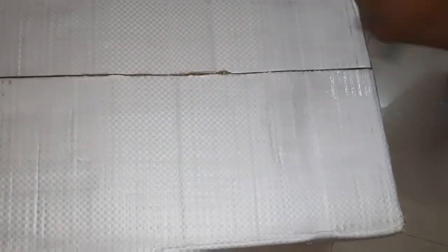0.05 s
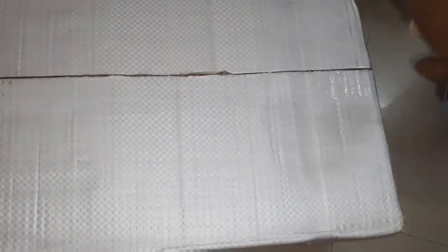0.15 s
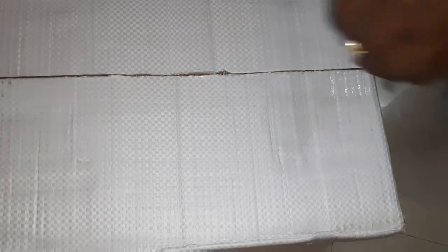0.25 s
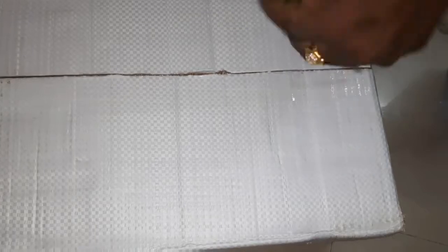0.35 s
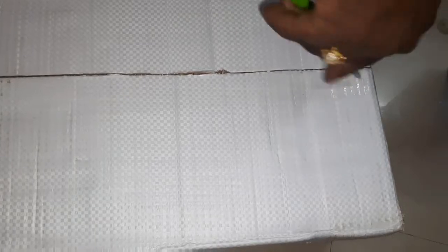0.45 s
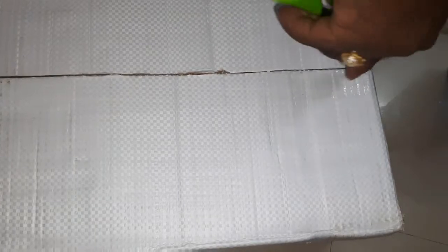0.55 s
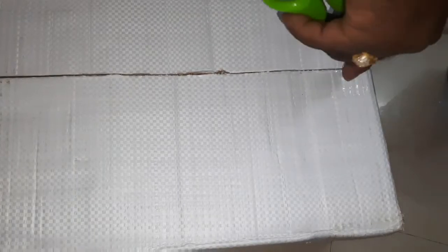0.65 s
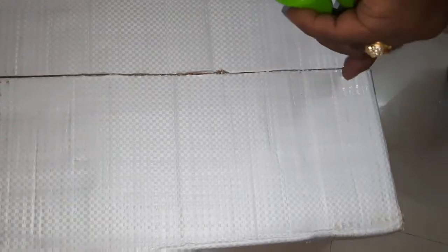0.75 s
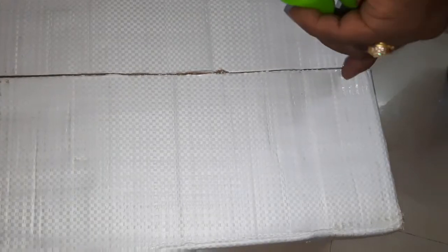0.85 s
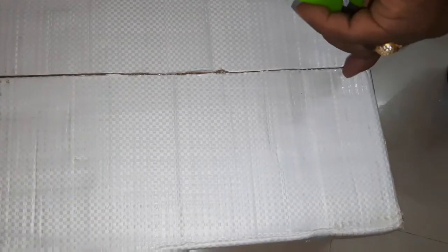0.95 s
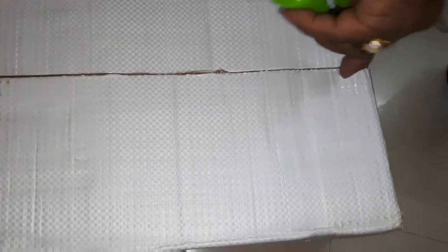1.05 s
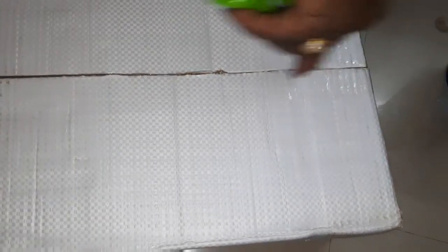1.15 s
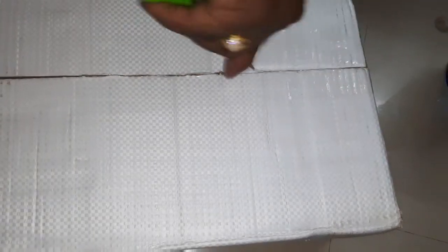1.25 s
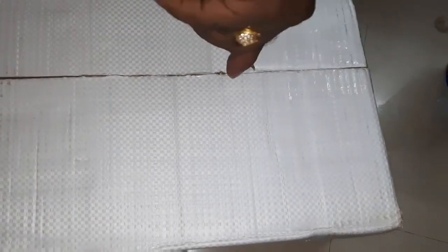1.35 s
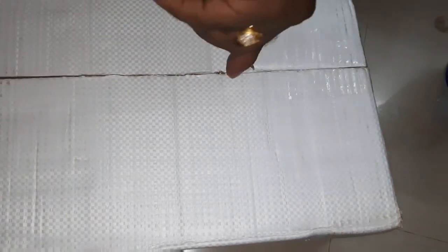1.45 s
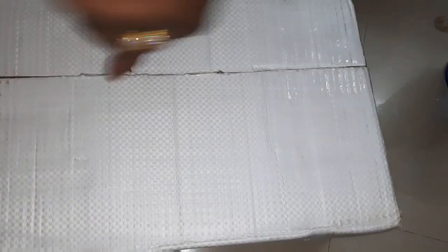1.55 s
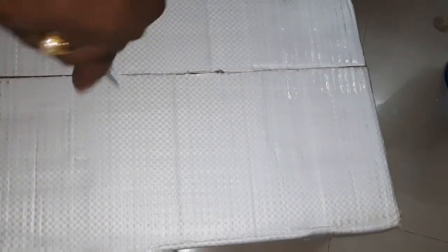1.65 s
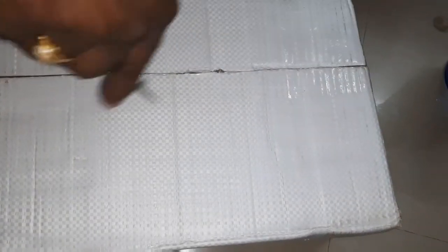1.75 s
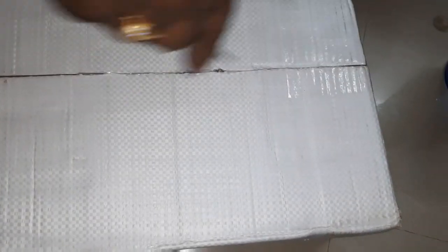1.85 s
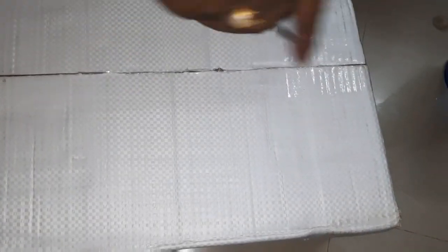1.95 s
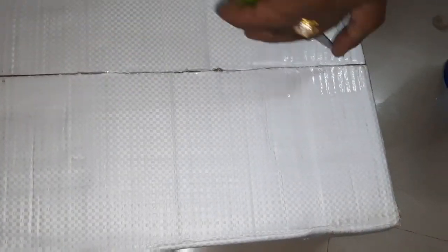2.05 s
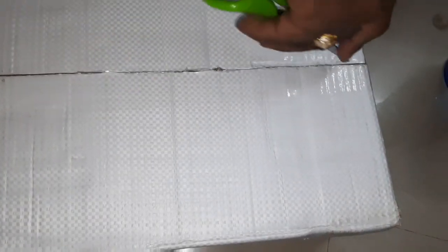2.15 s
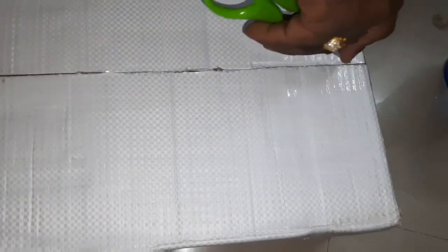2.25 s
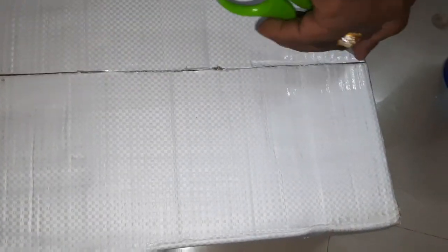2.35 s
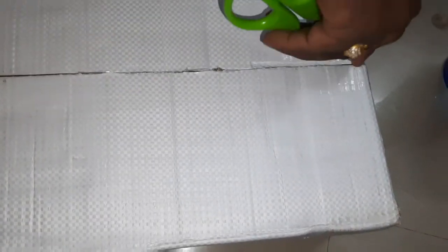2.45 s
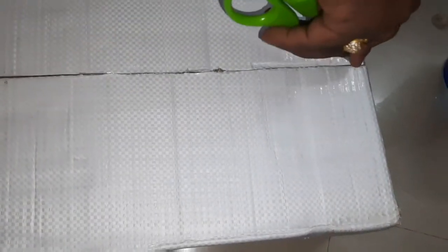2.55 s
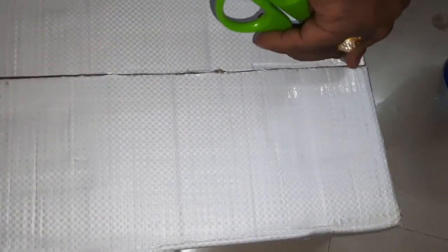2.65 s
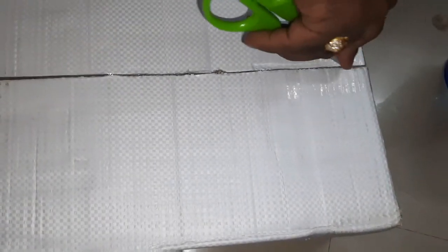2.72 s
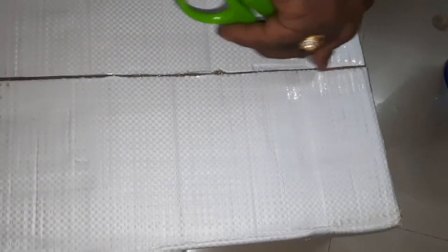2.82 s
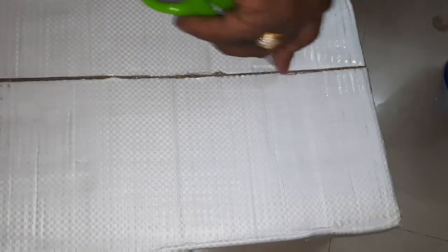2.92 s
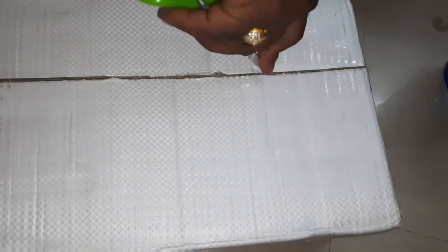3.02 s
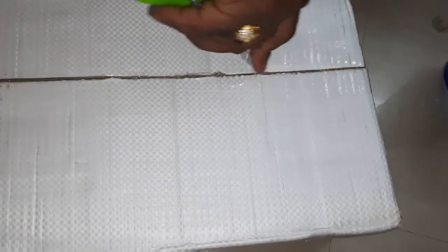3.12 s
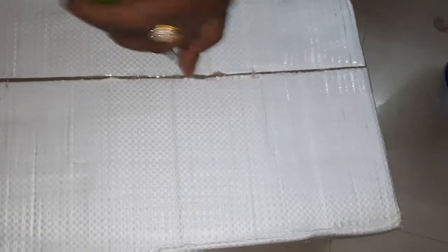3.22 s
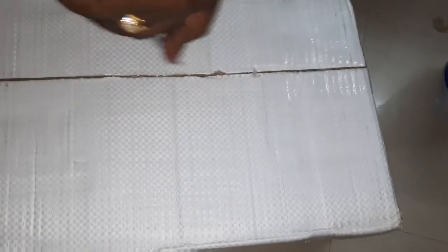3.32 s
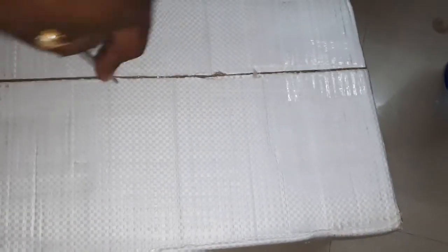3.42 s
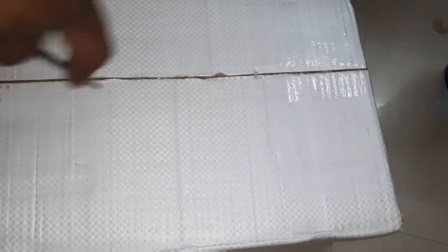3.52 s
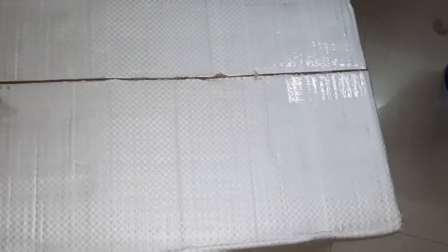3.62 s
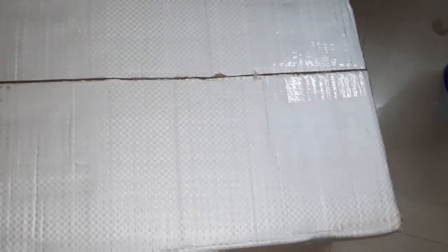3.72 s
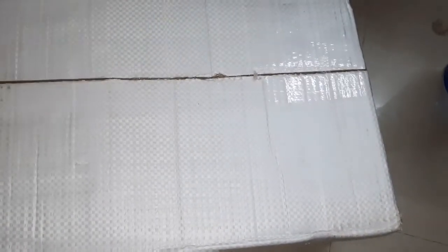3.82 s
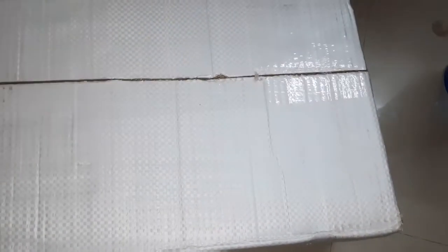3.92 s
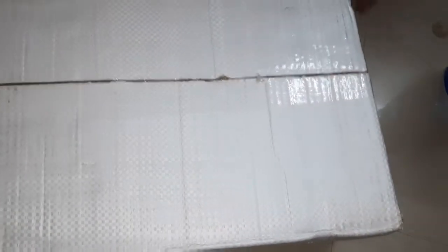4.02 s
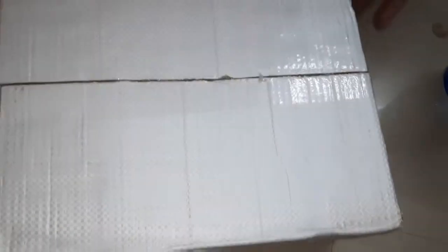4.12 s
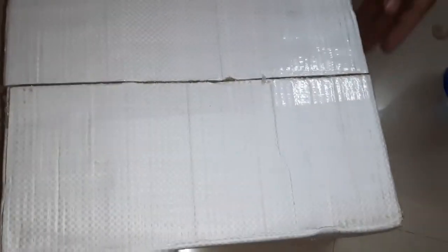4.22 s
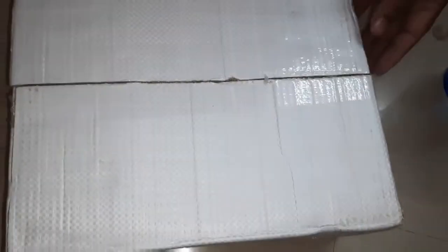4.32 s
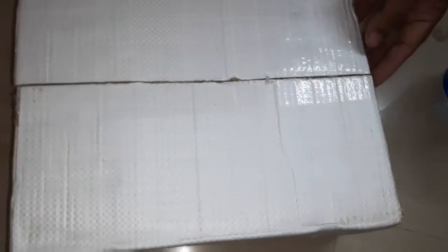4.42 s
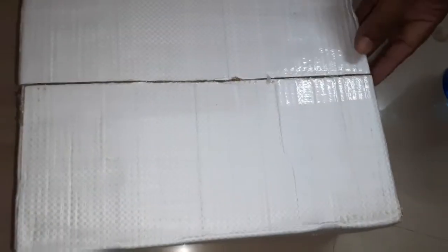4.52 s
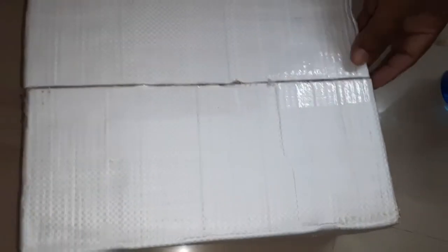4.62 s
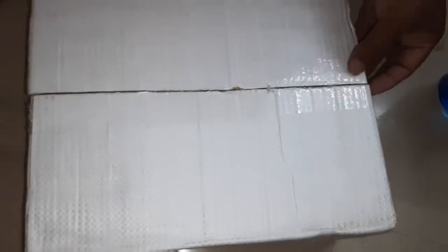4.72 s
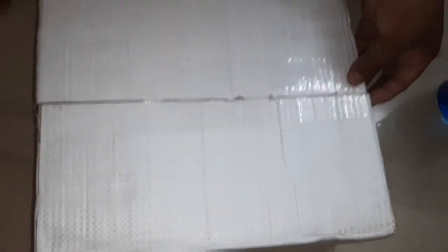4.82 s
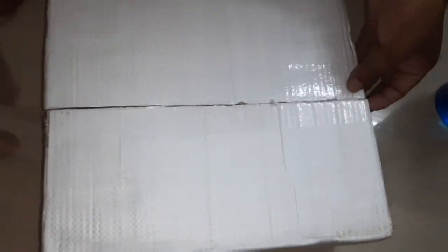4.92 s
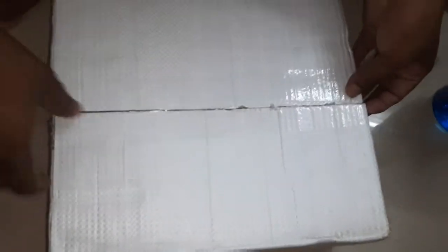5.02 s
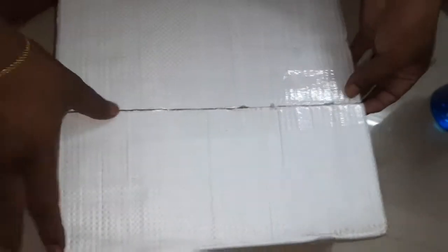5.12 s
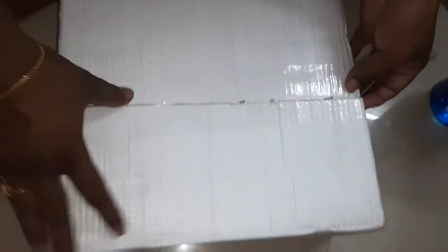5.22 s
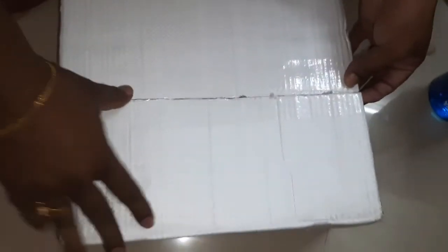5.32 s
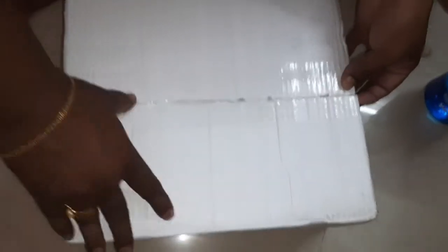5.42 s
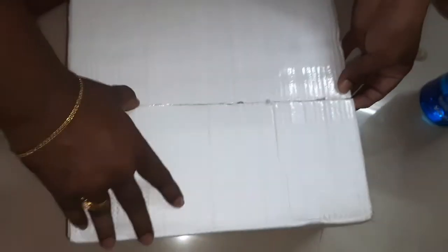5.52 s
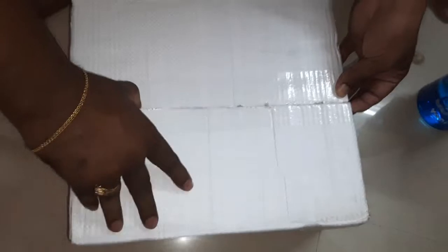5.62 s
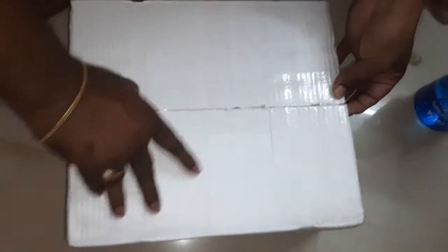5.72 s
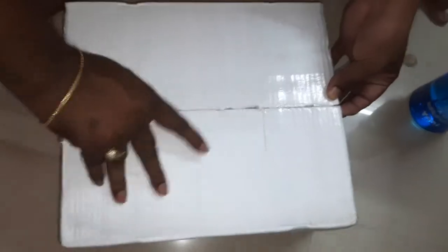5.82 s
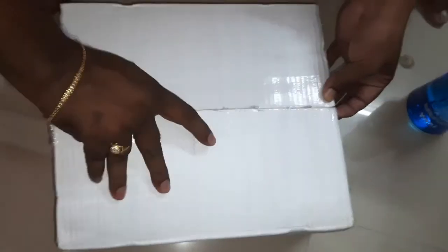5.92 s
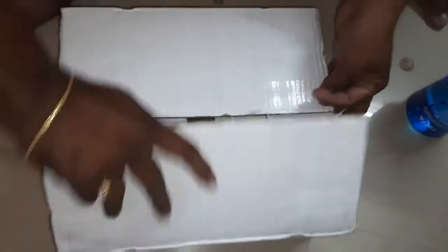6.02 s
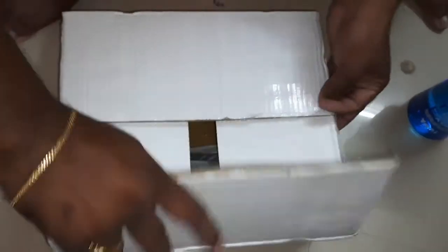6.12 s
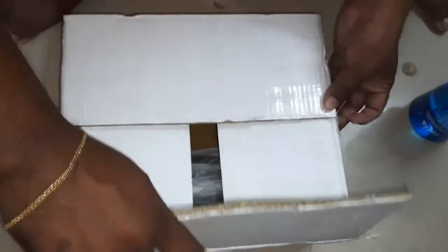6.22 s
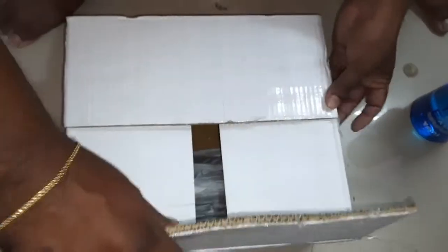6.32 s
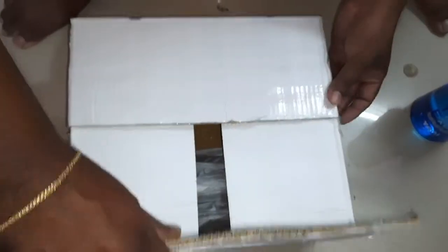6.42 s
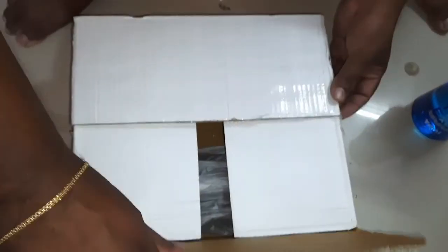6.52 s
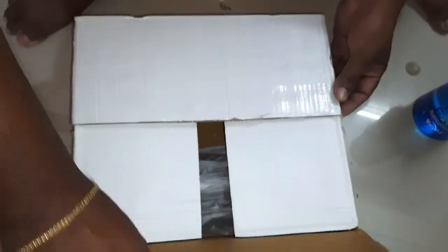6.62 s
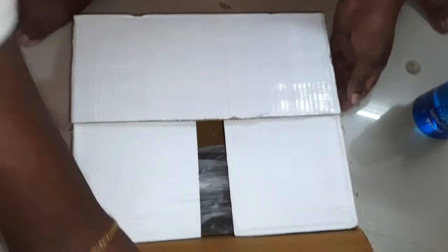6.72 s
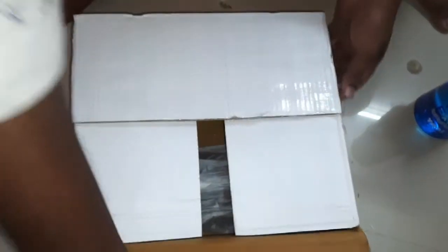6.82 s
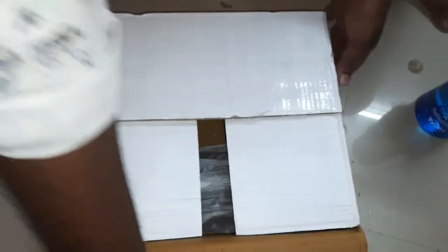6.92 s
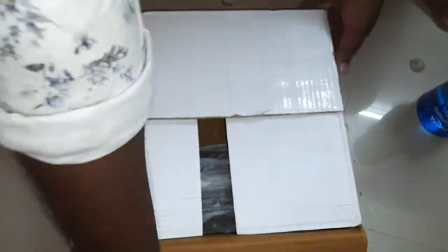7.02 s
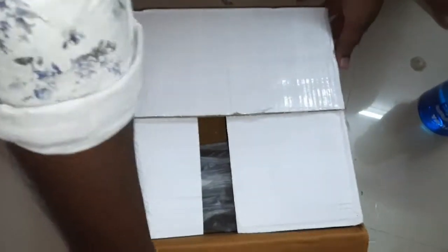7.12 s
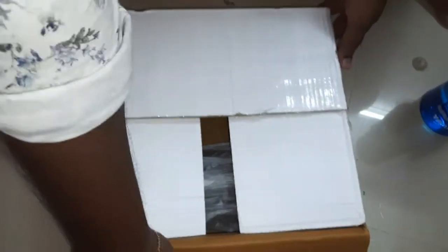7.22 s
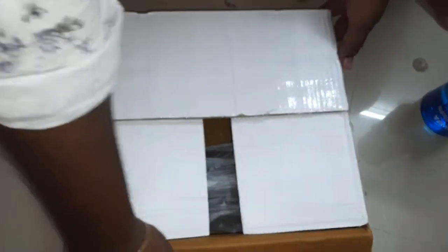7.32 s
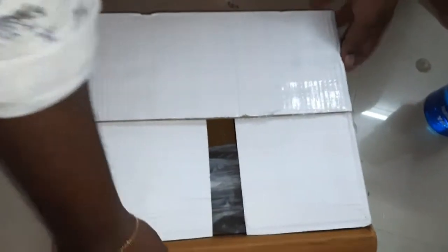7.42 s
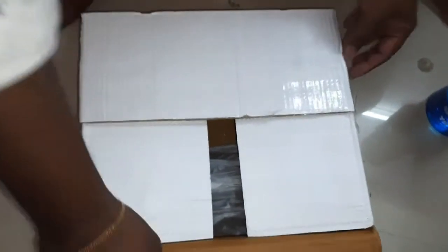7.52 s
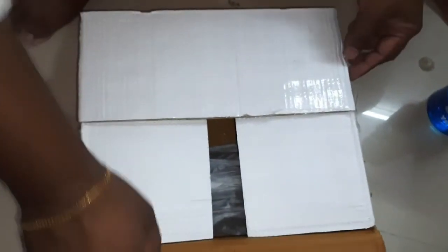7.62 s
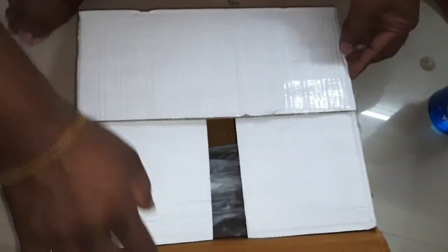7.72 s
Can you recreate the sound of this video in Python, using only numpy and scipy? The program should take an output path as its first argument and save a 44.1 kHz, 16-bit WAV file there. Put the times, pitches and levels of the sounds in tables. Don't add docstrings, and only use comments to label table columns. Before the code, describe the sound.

Short hollow blade drags over a cardboard box, a metallic clink, then peeling tape pops, two booming thumps and crackling card folding back.

```python
import sys
import numpy as np
from scipy import signal
from scipy.fft import rfft, irfft
from scipy.io import wavfile
from scipy.ndimage import uniform_filter1d

SR = 44100
rng = np.random.default_rng(int(sys.argv[2]) if len(sys.argv) > 2 else 0)


def dump_mix(stems):
    frames = np.atleast_2d(stems).T
    limited = np.clip(frames, -1, 1)
    pcm = np.round(limited * 32767).astype(np.int16)
    wavfile.write(sys.argv[1], SR, pcm)


def natural_amplitude(level_db):
    exponent = np.asarray(level_db, float) / 20
    return 10 ** exponent


N = 342216


def unit_rms(x):
    return x / np.sqrt(np.mean(x ** 2) + 1e-20)


def read(points, hz):
    f, value = np.transpose(points)
    return np.interp(np.log(hz + 1), np.log(f + 1), value)


def add(mix, s, sound):
    part = mix[round(s * SR):][:len(sound)]
    part += sound[:len(part)]


def filtered(x, points):
    return irfft(rfft(x) * natural_amplitude(read(points, np.fft.rfftfreq(len(x), 1 / SR))), len(x))


def coloured(x, points):
    return unit_rms(filtered(x, points))


def ring(modes, seconds, shift=1):
    t = np.arange(round(seconds * SR)) / SR
    return sum(natural_amplitude(db - 60 * t / t60) * np.sin(2 * np.pi * hz * shift * t) for hz, db, t60 in modes)


def levels(tables):
    out = np.zeros((len(tables[0][0]) - 1, N))
    for rows in tables:
        s, *columns = np.transpose(rows)
        t = np.arange(s[0], s[-1], 1 / SR)
        since_start = t - s[0] + (s[0] == 0)
        edge = np.clip(np.minimum(since_start, s[-1] - t) / 0.0016, 0, 1)
        for line, db in zip(out, columns):
            add(line, s[0], edge * natural_amplitude(np.interp(t, s, db)))
    return out


# (f/Hz, level/dB per Hz)
RUMBLE = [(28, -44), (40, -5), (176, -6), (239, -8), (399, -13.5), (454, -15.5), (778, -23), (930, -28),
          (1300, -29.5), (1680, -31.5), (1810, -29), (2400, -32), (3350, -35.5), (4440, -54.5),
          (8500, -58.5), (13500, -54.5), (16000, -57.5)]
# (t/s, level/dB)
WHINE = [(0, -77), (1.8, -85), (3.6, -81), (3.95, -74), (4.15, -71.5), (4.4, -82), (7.76, -76)]


def house():
    swell = uniform_filter1d(rng.standard_normal(N), size=5000)
    swell_db = 1.2 * unit_rms(uniform_filter1d(swell, size=5000))
    rumble = natural_amplitude(-55.5 + swell_db) * coloured(rng.standard_normal(N), RUMBLE)
    hum_hz, hum_width_hz, hum_db = 49.5, 10, -64.5
    hum = signal.oaconvolve(rng.standard_normal(N), ring([(hum_hz, 0, 2.6 / hum_width_hz)], .3))[:N]
    hum = natural_amplitude(hum_db) * unit_rms(np.diff(hum, prepend=0))
    whine_hz, whine_width_hz = 2330, 55
    whine = signal.oaconvolve(rng.standard_normal(N), ring([(whine_hz, 0, 2.4 / whine_width_hz)], .1))[:N]
    return levels([WHINE])[0] * unit_rms(whine) + rumble + hum


# (f/Hz, t60/s)
ROOM = [(125, 0.31), (500, 0.28), (2000, 0.27), (6000, 0.27), (14000, 0.19)]


def room(x):
    hz, t, z = signal.stft(rng.standard_normal((3, SR // 2)), SR, nperseg=256)
    tails = signal.istft(z * natural_amplitude(-60 * t / read(ROOM, hz)[:, None]), SR, nperseg=256)[1]
    tails = tails * np.clip(np.arange(tails.shape[1]) / (0.0013 * SR), 0, 1)
    turn = 2 * np.pi * (np.arange(N) / (.13 * SR) + np.arange(3)[:, None] / 3)
    shares = np.sqrt(2 / 3) * np.cos(turn) * x
    return signal.fftconvolve(shares, tails / np.linalg.norm(tails[0]), axes=1)[:, :N].sum(0)


# (t/s, peak level/dB, centre f/Hz)
TICKS = [(1.0927, -55, 8600), (1.653, -33, 6400), (1.83, -59, 9630), (1.9294, -66.5, 5900),
         (2.577, -54, 13200), (2.8494, -43, 5400), (2.8873, -42, 5360), (3.009, -31, 9150),
         (3.119, -45.5, 5880), (4.7036, -47, 12500), (4.795, -43, 11600), (5.2135, -56, 12000),
         (5.2629, -53.5, 5370), (5.2713, -46, 11100), (5.3294, -67, 5510), (5.472, -52, 12200),
         (5.625, -50, 11000), (5.642, -56, 8000), (5.672, -53, 10500), (5.683, -47, 4600),
         (5.8306, -51, 5600), (6.124, -44, 9720), (6.86, -39, 12600), (7.2315, -49, 12400),
         (7.275, -53, 11700)]


def ticks():
    out, t = np.zeros(N), np.arange(300) / SR
    for (s, db, hz), noise in zip(TICKS, rng.standard_normal((len(TICKS), len(t)))):
        burst = np.convolve(noise, ring([(hz, 0, .0006)], .001))[:len(t)]
        add(out, s, natural_amplitude(db - 60 * t / 0.0031) * unit_rms(burst))
    return out


# (t/s, peak level/dB, long blade level/dB, short blade level/dB, tick level/dB)
CLINKS = [
    (0.284, -46.5, -72, -70, -7.5),
    (.362, -33.5, -54, -68, 5),
    (0.3692, -39.5, -58, -63, 7),
    (0.383, -45.5, -68, -66.5, -2),
    (4.171, -41.5, -68, -54.5, -7),
    (4.195, -49.5, -70, -52.5, 3),
    (4.376, -33.5, -59, -53, 9),
    (4.396, -33, -51, -59, 18),
    (4.4085, -27.5, -54, -60, 4.5),
    (4.452, -34.5, -54, -55, -8),
]
# (f/Hz, level/dB)
HELD_STEEL = [(6500, -2), (3870, -5), (7820, 2), (8500, 0.5), (8800, 5), (9340, 1), (9860, -1), (10500, 1),
              (11300, 0), (12100, 1), (12900, 0), (13400, -1), (14900, -1.5), (15700, 2.5)]
TIPPED_STEEL = [(2815, -6), (4170, 0), (4880, -0.5), (5140, -2), (5800, -6), (7970, -5), (8520, 5),
                (9900, 2), (10600, -5), (11400, 3), (12600, -4), (13200, 4), (13900, 5), (15400, 0)]
LAID_STEEL = [(5300, -7), (6730, -8), (7520, 2), (7900, -3), (8870, 5), (11100, -2), (10450, 1),
              (11600, -3), (11990, -2), (12820, 11), (13400, 2), (14200, 0), (14760, -5.5), (15500, -5)]
BLADES_HZ = (2740, 3344)
# (f/Hz, level/dB per Hz)
SPRAY = [(2000, -23), (3000, 8.5), (4500, -5), (6200, -12), (8000, -7.5), (15500, 8)]
SPRAY_DB = (-9.5, -5, -10.5)


def clinks():
    out, t = np.zeros(N), np.arange(round(.3 * SR)) / SR
    high = signal.butter(5, 7500, "high", fs=SR)
    haze = signal.butter(3, 2400, "high", fs=SR)
    steel_cycles, blade_cycles = 95, 140
    mix_spread_db = 4
    tipped_from_s, laid_from_s = 4, 4.3
    mixes = rng.standard_normal((len(CLINKS), len(LAID_STEEL)))
    for (s, db, long_db, short_db, tick_db), mix in zip(CLINKS, mixes):
        stage = np.searchsorted([tipped_from_s, laid_from_s], s)
        modes = (HELD_STEEL, TIPPED_STEEL, LAID_STEEL)[stage]
        cycles = steel_cycles * (0.72, 0.72, 1)[stage]
        steel = ring([(hz, db - 35.5 + d + mix_spread_db * m, cycles / hz)
                      for (hz, d), m in zip(modes, mix)], .1)
        blades = ring([(hz, d - 16, blade_cycles / hz)
                       for hz, d in zip(BLADES_HZ, (long_db, short_db))], .1)
        chatter_t60_s = (0.041, 0.23, 0.26)[stage]
        chatter = rng.standard_normal(len(t))
        chatter = chatter * (natural_amplitude(-60 * t / 0.0084) + natural_amplitude(-3.0 - 60 * t / chatter_t60_s))
        blurred = signal.fftconvolve(steel + blades, chatter)[:len(t)]
        hiss = natural_amplitude(db + SPRAY_DB[stage]) * np.std(chatter) * coloured(chatter, SPRAY)
        rung = signal.lfilter(*haze, blurred + hiss)
        tick = signal.lfilter(*high, rng.standard_normal(len(t)))
        tick = tick * (natural_amplitude(-60 * t / 0.011) + natural_amplitude(8.0 - 60 * t / 0.0014)) * (1 - np.exp(-t / 0.00008))
        add(out, s, rung + natural_amplitude(db + tick_db - 3) * tick)
    return out


# (t/s, level/dB)
CREASE = [(6.455, -65), (6.48, -57), (6.53, -50), (6.62, -55.5), (6.668, -69), (6.69, -76)]
# (f/Hz, width f/Hz, level/dB)
CREASE_BANDS = [(1100, 280, -4), (1690, 240, 0), (2010, 240, -4)]


def crease():
    shape = ring([(hz, db, 2.2 / width) for hz, width, db in CREASE_BANDS], .03)
    bands = signal.oaconvolve(rng.standard_normal(N), np.convolve(shape, shape))
    return levels([CREASE])[0] * unit_rms(bands[:N])


# (t/s, peak level/dB, ring f/Hz, treble level/dB)
SNAGS = [(0.0094, -14, 1674, -20), (0.919, -56, 2910, -56.5), (1.144, -26, 1780, -36),
         (1.183, -26.5, 3240, -43), (1.2038, -24, 3950, -42.5), (1.211, -22, 3230, -45),
         (1.219, -24, 2030, -50), (1.247, -34, 2280, -36), (1.292, -29, 2740, -47),
         (1.305, -32.5, 1500, -50), (1.2686, -27, 2380, -30), (1.531, -42, 2600, -57),
         (1.5605, -22, 1110, -41.5), (1.602, -23, 3020, -56.5), (2.6786, -41, 3790, -42),
         (2.725, -32, 1740, -48.5), (2.821, -32.5, 2708, -50), (2.845, -30.5, 2400, -52),
         (2.906, -22.5, 1960, -49.5), (2.923, -24, 2380, -38), (2.935, -21, 1910, -46),
         (3.001, -27.5, 2500, -47), (2.9495, -23, 2100, -31.5), (2.9699, -22.5, 2400, -41),
         (3.029, -25.5, 2300, -35), (3.1282, -36, 2200, -49), (3.172, -38.5, 2040, -47),
         (3.2102, -14, 5430, -26.5), (3.2225, -13, 3400, -37), (3.27, -24, 2330, -47.5), ]
PEELS = [(4.624, -30, 2800, -79), (4.77, -64, 2200, -54), (4.8288, -42, 1360, -46.5),
         (4.8642, -41, 1430, -54), (4.98, -45, 2500, -53.5), (5.504, -66, 2200, -56),
         (5.524, -34.5, 3520, -45.5), (5.5463, -41, 3280, -57), (5.568, -43, 3560, -52),
         (5.5956, -37.5, 3440, -67.5), (5.632, -35.5, 3060, -73), (5.664, -42, 3360, -58),
         (5.7036, -16, 2740, -27.5), (5.8, -32, 2600, -65), (5.859, -26, 2630, -67),
         (5.8944, -36, 3870, -47), (5.948, -23.5, 2340, -67), (5.9665, -7.5, 2310, -21),
         (6.0219, -17, 5350, -20), (6.0238, -16.5, 3200, -30.5), (5.701, -30.5, 2170, -37),
         (5.6375, -41, 3000, -70), ]
FOLDS = [(6.1537, -28.5, 3120, -33), (6.226, -38, 5940, -45), (6.2409, -30, 1950, -43),
         (6.265, -25, 3330, -50), (6.289, -31, 2550, -37), (6.317, -26, 2490, -33.5),
         (6.3712, -27, 2500, -72), (6.537, -25, 2450, -36), (6.7588, -32, 2340, -38.5),
         (6.7704, -32, 2150, -39), (6.7925, -30, 2620, -60), (6.8184, -31.5, 2570, -46),
         (6.841, -37, 3100, -46), (6.9129, -32, 3250, -45), (6.96, -36, 3700, -45),
         (6.997, -34.5, 3230, -45), (7.0876, -40.5, 3270, -52), (7.128, -30, 1630, -58),
         (7.2146, -46, 2780, -52), (7.493, -46.5, 3570, -73), (7.5904, -56, 1650, -54)]


def snaps():
    near, far, t = np.zeros(N), np.zeros(N), np.arange(900) / SR
    high = signal.butter(2, [5200, 16500], "band", fs=SR)
    band = signal.butter(2, [1700, 4300], "band", fs=SR)
    rise = 1 - np.exp(-t / 0.00097)
    fade = natural_amplitude(-60 * t / 0.011) + natural_amplitude(-9.0 - 60 * t / 0.016)
    click, rows = signal.unit_impulse(len(t)), SNAGS + PEELS + FOLDS
    band_click, high_click = signal.lfilter(*band, click), signal.lfilter(*high, click)
    for (s, db, hz, treble_db), noise in zip(rows, rng.standard_normal((len(rows), 2, len(t)))):
        body = natural_amplitude(db - 9.5) * unit_rms(signal.lfilter(*band, noise[0]))
        treble = natural_amplitude(treble_db + 6.0) * unit_rms(signal.lfilter(*high, noise[1]))
        crack = treble * (.5 * rise * fade + natural_amplitude(0.5 - 60 * t / 0.0022))
        patch = ring([(hz, db + 1.5, .008)], len(t) / SR)
        add(near, s, rise * (patch + body * fade) + crack)
        far_patch = ring([(hz, db - 4, .003)], len(t) / SR)
        add(far, s, far_patch + natural_amplitude(db + 15.5) * band_click + natural_amplitude(treble_db + 19.5) * high_click)
    add(near, .0046, natural_amplitude(-12.5) * near)
    return near, far


# (f/Hz, level/dB, t60/s)
BOX = [(118, -8, 0.36), (144.9, 1.5, 0.13), (195, -1.5, 0.056), (258, -6.5, 0.034), (323.7, -4, 0.116),
       (400.6, -3.5, 0.11), (426.9, -6, 0.22), (534, 5.5, 0.038), (645, 2.5, 0.032), (883, -10.5, 0.026),
       (1130, -17, 0.027)]
# (t/s, boom level/dB, low patch f/Hz, high patch f/Hz, high patch level/dB)
KNOCKS = [(0.022, -9, 203, 484, -43.5), (0.496, -42.5, 152, 580, -76.5), (0.662, -32.5, 118, 463, -47),
          (1.536, -28, 139, 450, -27.5), (2.206, -35, 121, 547, -54), (2.447, -34.5, 115, 537, -66.5),
          (2.671, -35, 133, 620, -55.5), (3.207, -5, 147, 577, -18), (4.404, -32, 195, 580, -63.5),
          (4.817, -37, 136, 447, -47), (5.042, -41, 182, 500, -51), (5.373, -32, 148, 590, -69),
          (5.7035, -13, 204, 522, -23.5), (5.9663, -2, 209, 540, -11.5), (6.022, -1.5, 163.6, 464, -10.5),
          (6.241, -24, 197, 778, -32.5), (7.1264, -21, 361, 618, -23.5), (7.22, -40, 153, 660, -45)]
# (t/s, level/dB, centre f/Hz, t60/s)
SLAPS = [(3.209, -21, 550, 0.088), (3.2675, -26, 770, 0.054), (2.906, -27.5, 600, .04),
         (4.41, -50.5, 910, 0.64), (5.11, -35.5, 320, 0.14), (5.968, -20.5, 1380, 0.096),
         (6.024, -14, 900, 0.069), (6.243, -29.5, 780, 0.073), (7.9, -30, 1360, 0.037),
         (0.00401, -16.5, 370, .12), (3.207, -21, 3400, .09), (3.21, -20.5, 5500, 0.083),
         (5.706, -31, 3200, 0.2), (6.374, -39, 2800, 0.12), (7.129, -39, 2400, 0.021),
         (7.14, -47.5, 1500, 0.4), (1.2, -31.5, 2000, 0.32), (4.624, -44, 3700, 0.049),
         (2.72, -35, 680, 0.074)]


def knocks():
    out, t = np.zeros(N), np.arange(round(.25 * SR)) / SR
    shifts = rng.uniform(0.93, 1.05, len(KNOCKS))
    for (s, db, low_hz, high_hz, high_db), shift in zip(KNOCKS, shifts):
        boom = np.convolve(ring(BOX, .25, shift), np.hanning(90))[:len(t)]
        small_db = -14 * max(np.log2(low_hz / 210), 0)
        low = natural_amplitude(db + small_db) * boom / abs(boom).max() + ring([(low_hz, db - 0.5, .05)], .25)
        low = low * (1 - np.exp(-t / 0.0022))
        turns = high_hz * (t + 0.34 * 0.0024 * (1 - np.exp(-t / 0.0015)))
        high = np.sin(2 * np.pi * turns) + 0.21 * np.sin(3.6 * np.pi * turns)
        high = natural_amplitude(high_db + 8.0 - 60 * t / 0.022) * high * (1 - np.exp(-t / 0.0013))
        add(out, s + .0015, low + high)
    for (s, db, hz, t60), noise in zip(SLAPS, rng.standard_normal((len(SLAPS), len(t)))):
        slap = unit_rms(np.convolve(noise, ring([(hz, 0, 5.6 / hz)], .02))[:len(t)])
        add(out, s, natural_amplitude(db - 6 - 60 * t / t60) * slap)
    return out


def layers(moves, tones):
    pivot_db = -47
    boom_follows, fizz_follows = 0.98, 1
    return [[(s, pivot_db + boom_db + boom_follows * (press - pivot_db), press,
              speed, pivot_db + fizz_db + fizz_follows * (speed - pivot_db))
             for s, press, speed in rows] for rows, (boom_db, fizz_db) in zip(moves, tones)]


# (f/Hz, level/dB per Hz)
FIZZ = [(2350, -20.5), (4000, -6.5), (7840, -8.5), (9180, -9), (13000, -7), (15300, -13.5), (16200, -14)]


def rub(tables, scrape, bumps_per_s, bump_s, gated):
    boom_gain, knock_gain, scrape_gain, fizz_gain = levels(tables)
    sizes = natural_amplitude(-1.0 * np.minimum(rng.exponential(1, N), 4))
    bumps = sizes * (rng.random(N) < bumps_per_s / SR)
    push = np.convolve(bumps, np.hanning(max(round(bump_s * SR), 3)), "same")
    push = push - uniform_filter1d(push, size=200)
    boom, panel = (unit_rms(irfft(rfft(push) * rfft(ring(modes, 0.26), N), N))
                   for modes in np.split(BOX, [4]))
    knock = unit_rms(panel + unit_rms(push))
    puffs = signal.oaconvolve(bumps, np.exp(-np.arange(600) / (0.0034 * SR)))[:N]
    grit = (1 + gated * unit_rms(puffs)) * rng.standard_normal((2, N))
    drum = boom_gain * boom + knock_gain * knock
    return drum + scrape_gain * coloured(grit[0], scrape) + fizz_gain * coloured(grit[1], FIZZ)


# (t/s, pressure level/dB, speed level/dB)
HANDS = [
    [(.88, -76, -69), (1.04, -61, -76), (1.14, -52, -57.5)],
    [(3.45, -71, -75), (3.6, -61.5, -66.5), (3.77, -84, -78.5), (3.97, -58, -80), (4.07, -58.5, -69.5),
     (4.17, -84, -71.5)],
    [(4.55, -55, -68), (4.75, -54.5, -59), (4.89, -52.5, -58), (5.0, -57.5, -65), (5.13, -45, -55),
     (5.22, -66, -73), (5.35, -57, -68)],
    [(5.35, -54, -68), (5.37, -56, -66), (5.43, -52, -61), (5.45, -55, -72)],
    [(5.45, -52, -66), (5.57, -50, -60), (5.703, -47.5, -59.5)],
    [(5.75, -45.5, -49), (5.96, -47.5, -51.5)],
    [(6.08, -23, -42.5), (6.158, -50, -54), (6.228, -56, -61.5), (6.3, -45.5, -56), (6.356, -59, -60),
     (6.43, -54.5, -65.5), (6.61, -55.5, -63.5), (6.92, -76, -61), (7.02, -56, -66)],
    [(7.03, -62, -66), (7.146, -53, -63.5), (7.26, -56, -59), (7.34, -61.5, -76), (7.55, -59.5, -64),
     (7.69, -57.5, -54.5), (7.76, -44, -56.5)],
]
# (boom over knock level/dB, fizz over rustle level/dB)
HAND_TONES = [(3, -10), (2, -5), (-3.5, -10), (-3.4, -7.5), (-5.5, -4), (-1, -8.5), (-7, -4.5),
              (-0.5, -5.5)]
# (t after the stroke/s, pressure level/dB, speed level/dB)
SETTLE = [(0.001, -58.5, -64.5), (.12, -58, -66.5), (.24, -75.5, -79)]
SETTLE_TONE = (6.7, -12.5)
# (f/Hz, level/dB per Hz)
RUSTLE = [(530, 4), (900, 2.5), (1170, -2), (1790, -4.5), (2370, -3), (3530, -4.5), (3960, -16),
          (4500, -33), (5850, -28), (9900, -120)]


def hands_on_box():
    settling = [[(rows[-1][0] + s, press, speed) for s, press, speed in SETTLE] for rows in STROKES]
    moves = layers(HANDS + settling, HAND_TONES + [SETTLE_TONE] * len(STROKES))
    return rub(moves, RUSTLE, bumps_per_s=300, bump_s=0.0035, gated=0.45)


# (t/s, peak level/dB)
FLUTES = [(0.023, -12), (1.2079, -17.5), (1.237, -22), (1.2447, -19.5), (1.2519, -19), (1.2622, -16.5),
          (1.2694, -16.5), (1.28, -17.5), (1.2928, -20), (1.306, -20.5), (1.3082, -24), (2.916, -23.5),
          (2.9255, -20.5), (3.0299, -21.5), (3.0347, -23.5), (3.2709, -18)]
# (t/s, peak level/dB, ring f/Hz)
POPS = [(.0003, -16.5, 151), (.001, -25, 2100), (.363, -51, 1910), (1.158, -35, 1916), (1.241, -30, 1700),
        (1.262, -31, 2500), (1.278, -32, 2900), (1.531, -21, 650), (1.531, -34, 2800), (5.118, -34, 380),
        (5.131, -34, 370), (6.3708, -31, 3250), (6.1535, -40, 2500), (6.537, -37, 6200),
        (3.2675, -27.5, 1504), (4.377, -36, 9440), (4.623, -46, 2300), (4.865, -38.5, 1510),
        (5.9719, -15, 3080), (6.794, -34, 3300), (.0095, -18, 3500), (.021, -27, 1500), (1.606, -31, 3050),
        (3.009, -34, 2600), (3.2, -31, 1500), (3.2007, -27, 5000), (5.045, -47, 1000), (5.095, -47, 1150),
        (5.113, -38, 1190), (5.123, -37, 3030), (5.128, -38, 900), (5.15, -45, 1100), (5.7044, -10.5, 2740),
        (6.0225, -10.5, 5280), (6.0235, -12.5, 3320), (7.088, -36.5, 6330), (7.1287, -36, 6500),
        (7.131, -41, 8200)]


def pops():
    out, t = np.zeros(N), np.arange(-200, 200) / SR
    flute_hz, flute_s, push_phase = 404, .0011, .75
    push = np.exp(-.5 * (t / flute_s) ** 2) * np.cos(2 * np.pi * flute_hz * t - push_phase)
    for s, db in FLUTES:
        add(out, s + t[0], natural_amplitude(db + 2.0) * push)
    for s, db, hz in POPS:
        t60 = 16 / hz
        add(out, s, ring([(hz, db + 2.0, t60)], t60))
    return out


# (start t/s, end t/s, slips per s f/Hz, level/dB, fall per overtone level/dB)
JUDDERS = [
    (1.548, 1.62, 268, -19.5, -6),
    (1.61, 1.72, 280, -35.5, -17),
    (2.95, 3.03, 140, -21.5, -17.5),
    (1.2, 1.225, 420, -27.5, -20),
]


def judders():
    out = np.zeros(N)
    for start, end, hz, db, fall_db in JUDDERS:
        t = np.arange(0, end - start, 1 / SR)
        waver = unit_rms(uniform_filter1d(rng.standard_normal(len(t)), size=500))
        turns = np.cumsum(hz * (1 + 0.035 * waver)) / SR
        hum = sum(natural_amplitude(fall_db * k) * np.cos(2 * np.pi * (k + 1) * turns) for k in range(5))
        add(out, start, natural_amplitude(db) * np.sin(np.pi * t / (end - start)) ** 0.78 * hum)
    return out


# (t/s, pressure level/dB, speed level/dB)
STROKES = [
    [(0.0, -15, -25.5), (.01, -20.5, -39), (.022, -19, -33), (.036, -24.5, -42.5), (.106, -45, -62.5),
     (.16, -66, -64.5)],
    [(1.14, -44, -64), (1.148, -33, -42), (1.174, -31, -48), (1.204, -30.5, -36), (1.268, -27.5, -33.5),
     (1.308, -28.5, -39), (1.318, -31.5, -45.5), (1.39, -55, -64)],
    [(1.5305, -22, -51), (1.541, -21, -39), (1.599, -21.5, -37.5), (1.614, -26.5, -44.5), (1.655, -39, -53),
     (1.697, -54, -59), (1.75, -47.5, -73)],
    [(2.67, -58, -68), (2.674, -43.5, -65), (2.746, -53.5, -63), (2.815, -41.5, -55), (2.825, -30, -41.5),
     (2.84, -41, -52), (2.85, -33.5, -48.5), (2.88, -32.5, -49), (2.903, -33.5, -50)],
    [(2.902, -35, -53), (2.908, -31, -38.5), (2.931, -24.5, -40), (2.97, -26.5, -34.5), (2.988, -37.5, -48),
     (3.005, -32.5, -40), (3.02, -33, -49), (3.032, -23.5, -44), (3.084, -52, -62)],
    [(3.09, -49, -66), (3.196, -39, -57.5), (3.208, -19.5, -31.5), (3.224, -17, -29), (3.248, -34, -58.5),
     (3.266, -32, -52.5), (3.36, -48, -77)],
    [(5.03, -57, -64), (5.044, -45, -55), (5.088, -50.5, -66), (5.126, -41.5, -45), (5.2, -64, -66)],
]
# (boom over knock level/dB, fizz over scrape level/dB)
STROKE_TONES = [(0, -4), (1, -8), (4.5, -9), (2.5, -6), (0.5, -9), (5, 0.5), (11.5, -18)]
# (f/Hz, level/dB per Hz)
SCRAPE = [(590, -7), (1000, -5), (1360, -6.5), (1620, -4.5), (2060, -7.5), (2340, -3.5), (4500, -22),
          (5850, -38.5), (9900, -120)]


def blade_strokes():
    return rub(layers(STROKES, STROKE_TONES), SCRAPE, bumps_per_s=220, bump_s=0.0015, gated=1.1)


# (f/Hz, level/dB)
MIC = [(20, -0.1), (15700, -2), (15950, -17.5), (17000, -34.5)]


def scene():
    blade, slips, hands = blade_strokes(), judders(), hands_on_box()
    crackle, far_crackle = snaps()
    faint, blows, steel = ticks(), knocks() + pops(), clinks()
    to_room = natural_amplitude(-12.5) * (blade + slips) + natural_amplitude(-4.5) * (far_crackle + faint)
    to_room = to_room + natural_amplitude(-9.5) * blows + natural_amplitude(-1.0) * steel
    near = blade + hands + crackle + faint + blows + steel + slips + crease() + room(to_room)
    low_cut = signal.butter(4, 117.2, "high", fs=SR, output="sos")
    near = signal.sosfilt(low_cut, near)
    return filtered(near + house(), MIC)[None]


def low_pass(x):
    return signal.sosfilt(signal.butter(12, 16510, fs=SR, output="sos"), x)


def record(dry):
    limited = 0.63 * np.tanh(dry / 0.54)
    return low_pass(limited)


dry = scene()
out = record(dry)
dump_mix(out)
```